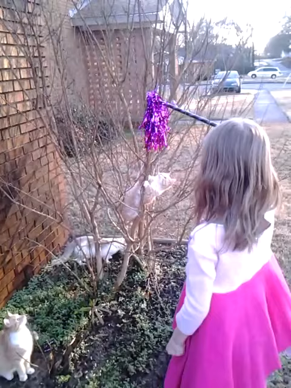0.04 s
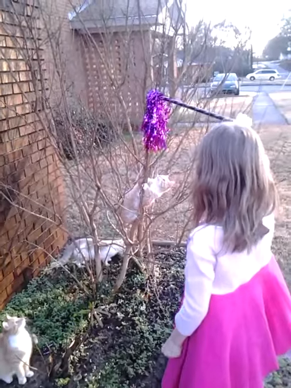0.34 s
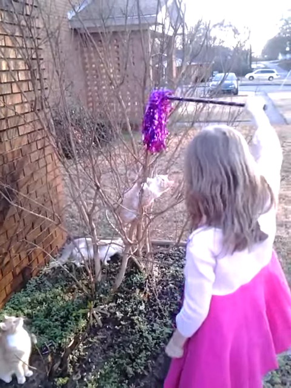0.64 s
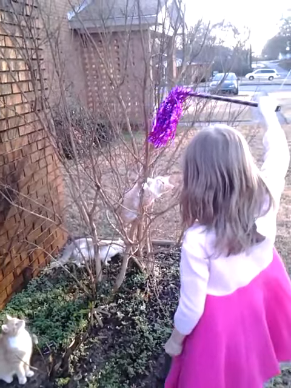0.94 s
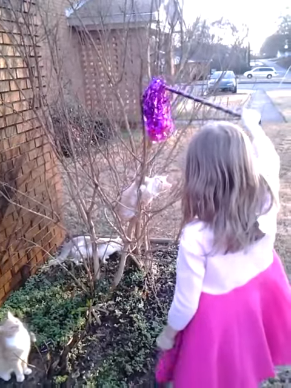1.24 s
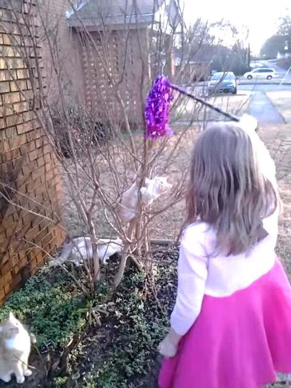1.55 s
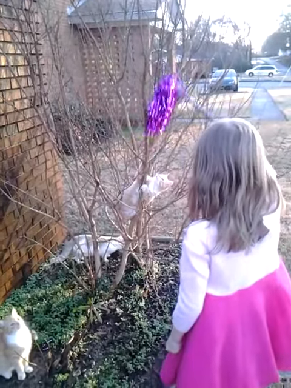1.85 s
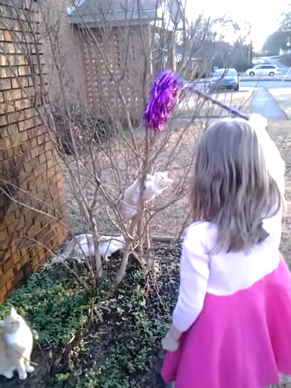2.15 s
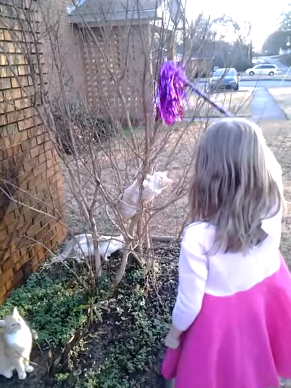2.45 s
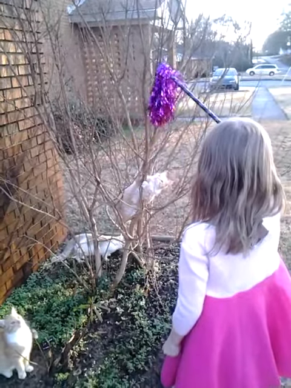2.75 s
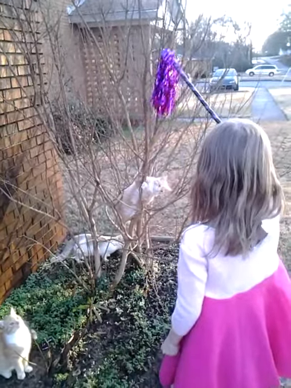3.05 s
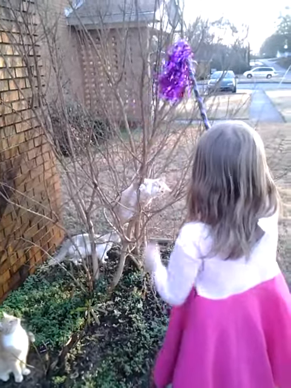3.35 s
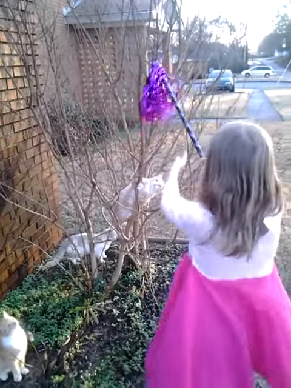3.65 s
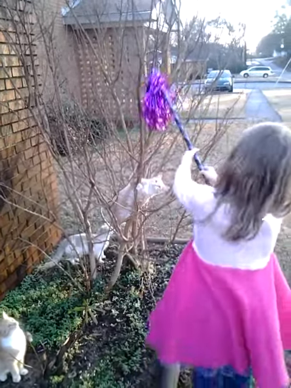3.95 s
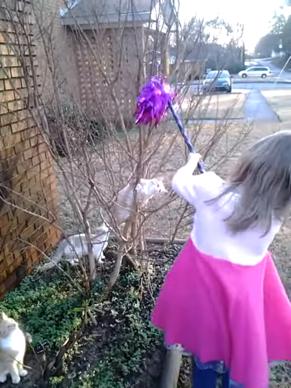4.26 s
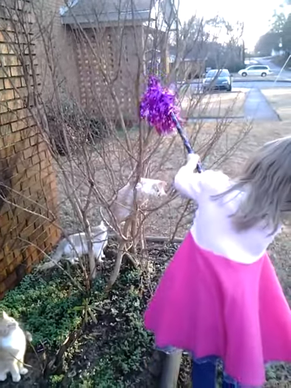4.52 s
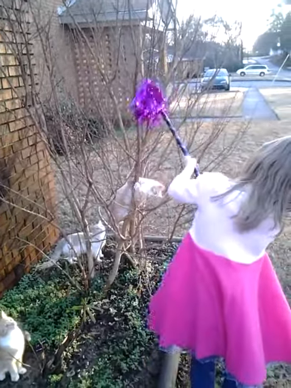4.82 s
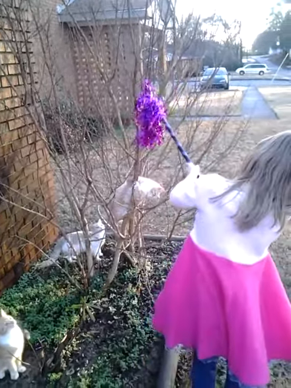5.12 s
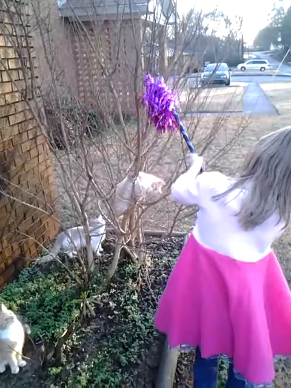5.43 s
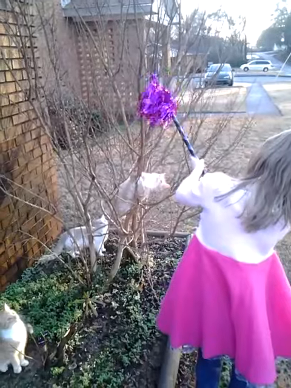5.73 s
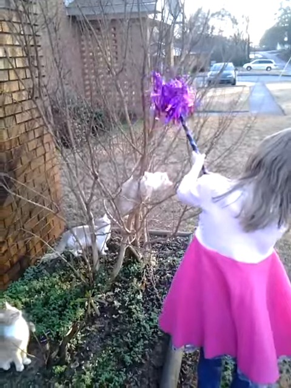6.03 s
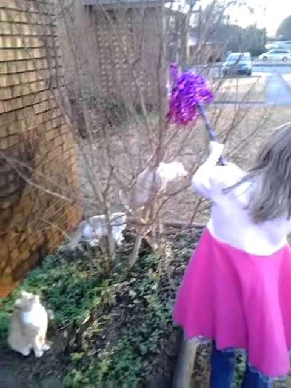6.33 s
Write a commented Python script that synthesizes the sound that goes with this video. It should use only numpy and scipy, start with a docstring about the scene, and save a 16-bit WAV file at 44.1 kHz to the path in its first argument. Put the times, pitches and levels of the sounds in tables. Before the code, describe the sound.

Bright, thin foil rustling rises and falls throughout as a tinsel pom-pom is shaken in a bare shrub near the microphone. Sharp crinkles pop out of the swishes. After a brief lull midway, the strokes come closer together, joined by dry clicks and tiny squeaks of the stick on twigs. The garden background is quiet: far road traffic, a few faint bird trills and one thin falling chirp.

```python
"""Tinsel pom-pom in a shrub

A tinsel pom-pom on a stick is swished among bare garden twigs. Its foil strips crinkle in
swells and now and then snap; the stick ticks against twigs. Road traffic washes in from
behind, doubled by a house wall; an engine hums and small birds call far off."""
import sys
import numpy as np
from scipy import signal
from scipy.fft import rfft, irfft, next_fast_len
from scipy.io import wavfile
from scipy.ndimage import uniform_filter1d, map_coordinates

SR = 44100
rng = np.random.default_rng(int(sys.argv[2]) if len(sys.argv) > 2 else 0)


def to_wav(sig):
    """Store sig (one row per channel, or 1-D mono) as 16-bit WAV at the path in sys.argv[1].

    Samples outside -1..1 are clipped; the rate is SR.
    """
    pcm = np.clip(np.atleast_2d(sig), -1, 1) * 32767
    pcm = np.round(pcm).astype(np.int16)
    wavfile.write(sys.argv[1], SR, pcm.T)  # frames by channels


N = 285944
CONTROL_HZ = 500
CONTROL_TIME_S = np.arange(0, N / SR, 1 / CONTROL_HZ)


def amp(db):
    """Decibels to gain."""
    return 10 ** (np.asarray(db) / 20)


def unit(x):
    """Scale to rms 1."""
    return x / np.sqrt(np.mean(x ** 2) + 1e-20)


def per_sample(times_s, values):
    """Interpolate to audio rate."""
    return np.interp(np.arange(N) / SR, times_s, values)


def wobble(rate_hz):
    """Smooth random curve through rate_hz knots a second."""
    knots = rng.standard_normal(int(N * rate_hz / SR) + 4)
    fine = map_coordinates(knots, [np.linspace(0, len(knots) - 1, 10 * len(knots))])
    return np.interp(np.arange(N) * 10 * rate_hz / SR, np.arange(len(fine)), fine)


def colour(x, spectrum):
    """Minimum-phase filter from (frequency [Hz], gain [dB]) points."""
    size = 2 * next_fast_len(N // 2 + 8192)
    hz, db = np.transpose(spectrum)
    bins_hz = np.fft.rfftfreq(size, 1 / SR)
    gain_db = np.interp(np.log(bins_hz + 1), np.log(hz), db)
    cepstrum = irfft(np.log(amp(gain_db)))[:size // 2]
    cepstrum[1:] *= 2
    return irfft(rfft(x, size) * np.exp(rfft(cepstrum, size)))[:N]


def noise(spectrum):
    """Coloured noise, rms 1."""
    return unit(colour(rng.standard_normal(N), spectrum))


def narrowband(hz, width_hz):
    """Noise band around a steady or moving pitch, rms 1."""
    phase = 2 * np.pi * np.cumsum(hz * np.ones(N)) / SR
    return unit(wobble(width_hz) * np.cos(phase) + wobble(width_hz) * np.sin(phase))


def add(track, start_s, sound):
    """Mix a sound into the track."""
    part = track[round(start_s * SR):][:len(sound)]
    part += sound[:len(part)]


def wall_echo(x, delay_s, gain):
    """Add one reflection, dulled by the rough wall."""
    dulled = uniform_filter1d(x, size=11)
    return x + gain * np.pad(dulled, (round(delay_s * SR), 0))[:N]


def garden_scatter(x, t60_s, wet_db):
    """Add scatter from walls, trunk and ground; its pattern changes as things move."""
    t, wet, block = np.arange(SR // 3) / SR, np.zeros(N), SR // 20
    for start in range(0, N, block):
        tail = rng.standard_normal(len(t)) * amp(-60 * t / t60_s) * (t > .003)
        tail /= np.linalg.norm(tail)
        add(wet, start / SR, signal.fftconvolve(x[start:start + block], tail))
    return x + amp(wet_db) * wet


def engine():
    """A distant engine hums and fades."""
    level_db = per_sample([0, 1.6, 2.3, 6.48], [-75.5, -74.5, -87, -89])
    hz = 150 + 1.6 * wobble(8.7)
    return amp(level_db + 1.1 * wobble(5.2)) * np.sin(2 * np.pi * np.cumsum(hz) / SR)


# Far trills: (start [s], length [s], level [dB])
BIRD_TRILLS = [(.68, 0.45, -62), (2.57, 0.37, -63), (3.994, 0.48, -62)]


def bird_trills(fade_s=0.1):
    """Faint buzzy trills, blurred by distance."""
    t, envelope = np.arange(N) / SR, np.zeros(N)
    for start_s, length_s, db in BIRD_TRILLS:
        inside_s = np.minimum(t - start_s, start_s + length_s - t)
        envelope += amp(db) * np.clip(.5 + inside_s / fade_s, 0, 1)
    return envelope * amp(1.6 * wobble(24.9)) * narrowband(4850, width_hz=800)


def bird_call(peak_s=3.24, peak_db=-46, attack_s=0.0093, fade_db_per_s=420, fall_hz_per_s=13000):
    """One thin falling note, ringing on between the houses."""
    age_s = np.clip(np.arange(N) / SR - peak_s, -.2, .3)
    hz = (5620 - fall_hz_per_s * age_s) * (1 + 0.0185 * wobble(300))
    level_db = peak_db + np.minimum(10 * age_s / attack_s, -fade_db_per_s * age_s)
    note = amp(level_db) * np.sin(2 * np.pi * np.cumsum(hz) / SR)
    return garden_scatter(note, t60_s=0.38, wet_db=-2.5)


# Cars passing gaps between houses:
# (nearest at [s], time to about -3 dB [s], roar [dB], hiss [dB], tread pitch [Hz], whine [dB])
CAR_PASSES = [(.25, 0.25, -58, -58, 1631, -56), (.51, 0.18, -62, -62, 1572, -51),
              (.85, .45, -59, -57.5, 1548, -68), (2.14, .1, -65, -59.5, 1465, -56),
              (2.95, .5, -58, -52, 1479, -63), (3.78, 0.18, -79, -59, 1484, -59),
              (6.1, 0.39, -60, -51, 1485, -49.6)]


def car_passes(steepness=1.608, doppler_shift=0.008, far_roar_db=-56, far_hiss_db=-50):
    """Roar, hiss and whine gains and tread pitch; houses screen each car either side of its gap."""
    nearest_s, width_s, roar_db, hiss_db, tread_hz, whine_db = np.transpose(CAR_PASSES)[:, :, None]
    along = (CONTROL_TIME_S - nearest_s) / width_s / np.sqrt(steepness)
    distance = np.hypot(1, along)
    falloff = distance ** -steepness
    roar_power, hiss_power, whine_power = (amp([roar_db, hiss_db, whine_db]) * falloff) ** 2
    shifted_hz = tread_hz * (1 - doppler_shift * along / distance)
    whine_hz = np.average(shifted_hz, axis=0, weights=whine_power)
    roar = np.sqrt(roar_power.sum(0) + amp(far_roar_db) ** 2)
    hiss = np.sqrt(hiss_power.sum(0) + amp(far_hiss_db) ** 2)
    whine = np.sqrt(whine_power.sum(0))
    return [per_sample(CONTROL_TIME_S, curve) for curve in (roar, hiss, whine, whine_hz)]


# Road roar: (frequency [Hz], relative density [dB])
ROAR_SPECTRUM = [(25, -56), (50, -26), (100, -23), (160, -6.5), (230, -2), (320, -3.5), (500, 1), (950, 5),
                 (1400, -3.5), (2400, -29.5)]
# Tyre hiss: (frequency [Hz], relative density [dB])
HISS_SPECTRUM = [(600, -31), (1000, -5.5), (1350, 1.5), (1700, -1.5), (2100, -5), (2500, -8.5),
                 (2850, -18.5), (4000, -21), (7000, -24), (15000, -25.5)]


def traffic():
    """Roar, tyre hiss and three bands of tread whine, made hollow by the wall's echo."""
    roar_gain, hiss_gain, whine_gain, whine_hz = car_passes()
    roar = roar_gain * amp(0.46 * wobble(6.18)) * noise(ROAR_SPECTRUM)
    hiss = hiss_gain * amp(1.06 * wobble(7)) * noise(HISS_SPECTRUM)
    whine = narrowband(whine_hz, width_hz=150)
    whine += amp(-9.5) * narrowband(.645 * whine_hz, width_hz=120)
    whine += amp(-11) * narrowband(1.38 * whine_hz, width_hz=220)
    return wall_echo(roar + hiss + whine_gain * whine, delay_s=.00821, gain=0.31)


# Stick on twigs: (time [s], level before trim [dB], pitch [Hz], ring time [s], crack re ring [dB])
TWIG_HITS = [(.158, -47, 4500, .02, 11), (3.05, -51.5, 3560, 0.17, -10.5), (3.12, -48, 3560, 0.1, -3.5),
             (3.944, -53, 2980, 0.022, 14), (3.981, -45, 3470, 0.021, 9), (4.183, -33, 2560, 0.027, -6),
             (4.198, -38, 6030, .015, 4.5), (4.314, -43.5, 2700, 0.039, 2),
             (4.499, -35.5, 2390, 0.025, -14), (5.06, -35, 5920, 0.027, -5.5),
             (5.064, -42.5, 2680, 0.02, 10), (5.723, -36.5, 2354, 0.04, -1), (6.256, -45, 5000, 0.02, 6)]


def twig_ticks(trim_db=-3.5):
    """A dry crack, then a brief squeak as the stick slides off; thin twigs give no bass."""
    track, t = np.zeros(N), np.arange(SR // 5) / SR
    crack_band = signal.butter(2, [2200, 6500], "band", fs=SR, output="sos")
    bass_cut = signal.butter(2, 900, "high", fs=SR, output="sos")
    for start_s, db, hz, ring_s, crack_db in TWIG_HITS:
        waver_rad = np.cumsum(0.16 * rng.standard_normal(len(t)))
        age = 7 * t / ring_s  # the rub peaks at 1
        ring = np.sin(2 * np.pi * hz * t + waver_rad) * (age * np.exp(1 - age)) ** 2
        burst = amp(-60 * t / .04) * rng.standard_normal(len(t))
        crack = signal.sosfilt(crack_band, burst)
        add(track, start_s, amp(db + trim_db) * (ring + amp(crack_db) * crack))
    return signal.sosfilt(bass_cut, track)


# Loudest strips buckling: (time [s], level before filter [dB])
LOUD_SNAPS = [(.0415, -21.5), (.158, -20.5), (.454, -26), (0.4993, -21.5), (.624, -23), (1.1397, -14.5),
              (1.186, -20), (1.266, -24.5), (1.371, -21.5), (1.526, -21), (1.6496, -24), (2.2246, -15),
              (2.283, -20), (2.309, -18.5), (3.137, -19), (4.1987, -21), (5.0854, -18), (5.7524, -13)]
# Snap filter: (frequency [Hz], gain [dB])
SNAP_SPECTRUM = [(1500, -41), (3000, -18), (5000, -15), (7000, -5.5), (8300, 4), (10000, 4.5), (12000, -5),
                 (15500, -16)]


def foil_snaps(rustle_db, small_per_s=13, over_rustle_db=8, spread_db=3):
    """A strip creases, flips back and shivers; small random snaps follow the rustle level."""
    track, t = np.zeros(N), np.arange(SR // 20) / SR
    attack = 1 - np.exp(-(t / .0014) ** 2)
    crease = amp(-60 * t / 0.01)
    shiver = 0.15 * amp(-60 * t / 0.1)
    starts = np.flatnonzero(rng.random(N) < small_per_s / SR)
    small_db = rustle_db[starts] + over_rustle_db + spread_db * rng.standard_normal(len(starts))
    for start_s, db in [*LOUD_SNAPS, *zip(starts / SR, small_db)]:
        flip_s = rng.uniform(.004, .0055)
        flip = 0.34 * (t > flip_s) * amp(-60 * abs(t - flip_s) / 0.013)
        envelope = attack * (crease + flip + shiver)
        add(track, start_s, amp(db) * envelope * rng.choice([-1, 1], len(t)))
    return colour(track, SNAP_SPECTRUM)


# Pom-pom strokes: (fastest at [s], rustle level [dB], time to -10 dB [s])
STROKES = [(.191, -43.5, 0.07), (.344, -46, 0.18), (.61, -39, .16), (.81, -43.5, 0.12), (.97, -39.5, 0.22),
           (1.345, -38, 0.09), (1.526, -40, 0.09), (1.675, -38, 0.16), (1.978, -33, 0.0867),
           (2.175, -32.5, 0.14), (2.536, -38.5, 0.07), (2.74, -43.3, 0.27), (3.135, -36, .1),
           (3.45, -51, .16), (3.635, -44, 0.1), (3.756, -39.5, 0.09), (4.017, -36.5, .03),
           (4.087, -38, 0.14), (4.32, -33.5, 0.1235), (4.51, -32.5, .052), (4.652, -36, .105),
           (4.84, -34.8, .11), (4.945, -37, .07), (5.117, -37, .205), (5.513, -40.5, 0.1),
           (5.79, -33.5, 0.18), (5.95, -39.5, 0.03), (6.093, -34.5, 0.12), (6.43, -48, 0.06)]


def stroke_level_db(tremble_db=-51, roundness=1.35):
    """Rustle level: symmetric swells add in power over strips that never quite rest."""
    power = amp(tremble_db) ** 2
    for fastest_s, db, width_s in STROKES:
        widths_away = np.minimum(abs(CONTROL_TIME_S - fastest_s) / width_s, 10)
        power = power + amp(db - 10 * widths_away ** roundness) ** 2
    return per_sample(CONTROL_TIME_S, 10 * np.log10(power))


def foil_pings(rustle_db, max_per_s=3500, spread_db=12.5, t60_s=0.0048):
    """Tiny pings at random pitches, rms 1; harder strokes make them denser."""
    rate_per_s = max_per_s * amp(rustle_db - np.max(rustle_db))
    starts = np.flatnonzero(rng.random(N) < rate_per_s / SR)
    size, pitch, phase = rng.random((len(starts), 3)).T[:, :, None]
    t = np.arange(SR // 200) / SR
    hz = 2500 + 13000 * pitch
    pings = amp(spread_db * size - 60 * t / t60_s) * np.sin(2 * np.pi * (hz * t + phase))
    indices = starts[:, None] + np.arange(len(t))
    track = np.bincount(indices.ravel(), pings.ravel(), N)[:N]
    return unit(track / np.sqrt(rate_per_s))  # same power at any density


# Foil rustle filter: (frequency [Hz], relative gain [dB])
FOIL_SPECTRUM = [(1500, -43.5), (2500, -23), (3450, -18), (4200, -20.5), (5100, -15), (5900, -17),
                 (6800, -8), (8200, 0.5), (8800, -1), (9400, 0.9), (11000, -4.5), (12500, -12),
                 (15500, -17.5)]


def tinsel_rustle(rustle_db, swish_db=6.5, trim_db=-0.34):
    """Crinkles over the swish of many strips brushing, catching and slipping in clumps."""
    pings = foil_pings(rustle_db)
    swish = amp(swish_db + wobble(120)) * rng.standard_normal(N)
    catching_db = 0.67 * wobble(20)
    return amp(rustle_db + trim_db + catching_db) * unit(colour(pings + swish, FOIL_SPECTRUM))


def scene():
    """Street and birds far behind, pom-pom close by; mono."""
    background = engine() + bird_trills() + bird_call() + traffic()
    rustle_db = stroke_level_db()
    pom_pom = twig_ticks() + foil_snaps(rustle_db) + tinsel_rustle(rustle_db)
    return (background + garden_scatter(pom_pom, t60_s=0.11, wet_db=-9.5))[None]


def record(dry):
    """The microphone keeps nothing above its band limit."""
    size, limit_hz = next_fast_len(N + 8192), 15750
    passband = np.fft.rfftfreq(size, 1 / SR) < limit_hz
    return irfft(rfft(dry, size) * passband, size)[:, :N]


dry = scene()
out = record(dry)
to_wav(out)
```